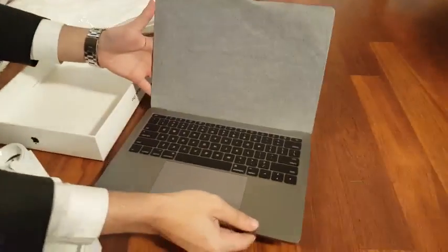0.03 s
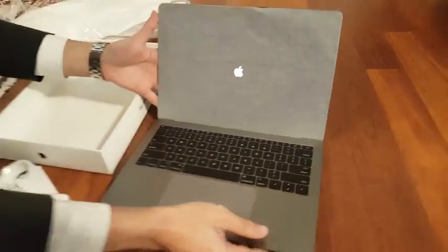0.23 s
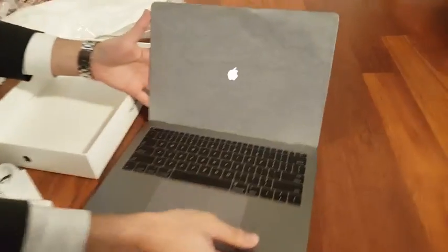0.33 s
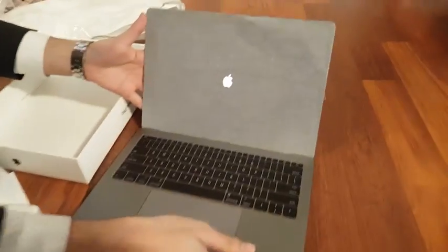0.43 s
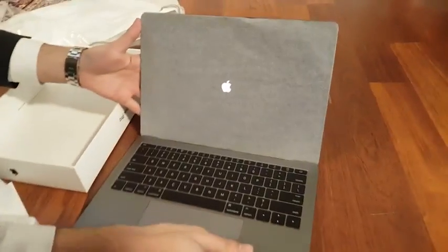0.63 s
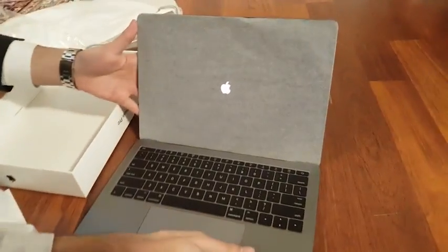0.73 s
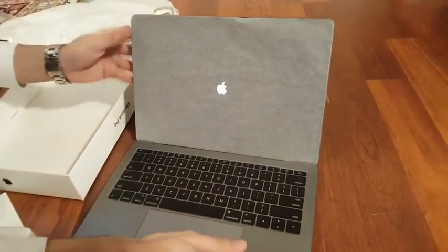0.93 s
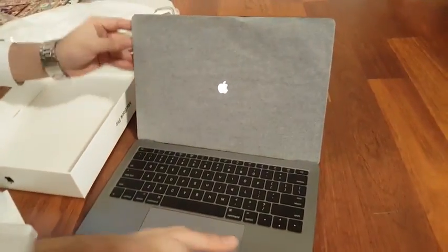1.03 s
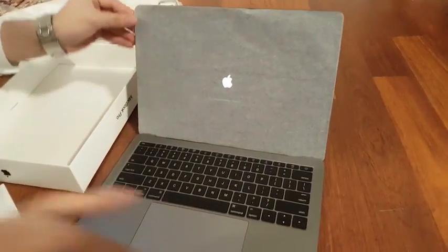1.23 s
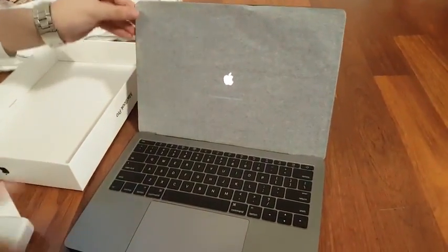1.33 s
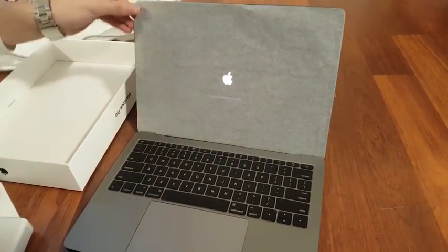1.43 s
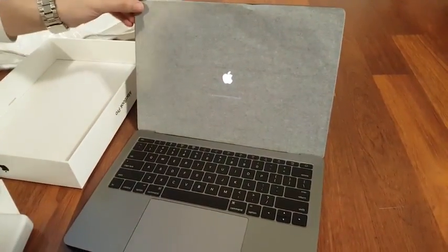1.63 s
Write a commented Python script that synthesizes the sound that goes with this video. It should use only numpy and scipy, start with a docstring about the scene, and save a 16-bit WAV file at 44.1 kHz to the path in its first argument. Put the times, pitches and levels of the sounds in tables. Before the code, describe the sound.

Two dull knocks of a laptop on wood, a settling bump, then a light lid clack.

```python
"""An open laptop is set down on a wooden floor, close in front of a stereo pair of microphones.
Its rubber feet knock twice, dully, ringing the boards and rattling the keys; it settles with a bump.
A hand lets go of the lid, which clacks twice in quick succession; fingers tick and a sleeve rustles.
Behind it the room is quiet and slightly live, with mains hum and a thin, high electronic whine."""
import sys
import numpy as np
from scipy import signal
from scipy.fft import rfft, irfft, next_fast_len
from scipy.io import wavfile
from scipy.ndimage import map_coordinates

SR = 44100
rng = np.random.default_rng(int(sys.argv[2]) if len(sys.argv) > 2 else 0)


def file_out(sig):
    """Save sig as 16-bit WAV at sys.argv[1]."""
    # one column per channel
    cols = np.atleast_2d(sig).T
    # limit, then scale
    lim = np.clip(cols, -1, 1)
    pcm = np.round(lim * 32767).astype(np.int16)
    wavfile.write(sys.argv[1], SR, pcm)


N = 74970  # 1.7 s


def amp(db):
    """Decibels to gain."""
    return 10 ** (np.asarray(db) / 20)


def along(points, hz):
    """Read a (frequency, value) curve on a log frequency axis."""
    freqs, values = np.transpose(points)
    return np.interp(np.log(hz + 1), np.log(freqs + 1), values)


def filtered(x, response):
    """Shape x by a gain given as a function of frequency."""
    size = next_fast_len(N + SR // 2)
    return irfft(rfft(x, size) * response(np.fft.rfftfreq(size, 1 / SR)), size)[..., :N]


def pan_bands(x, balance):
    """Tilt each band towards the left or right microphone."""
    return filtered(x, lambda hz: amp(along(balance, hz) * np.array([[.5], [-.5]])))


def wobble(rate):
    """A smooth random curve, rate knots a second."""
    knots = rng.standard_normal(int(N * rate / SR) + 4)
    return map_coordinates(knots, [np.arange(N) * rate / SR])


def since(start):
    """Seconds since a moment, zero before it."""
    return np.maximum(np.arange(N) / SR - start, 0)


def strike(start, attack_s, t60_s):
    """Envelope of a blow: quick rise, exponential fall."""
    age = since(start)
    return (1 - np.exp(-age / attack_s)) * np.exp(-np.log(1000) * age / t60_s)


def ring(start, modes, attack_s, alternate=True):
    """Struck, damped modes; neighbours swing in alternate directions, or all together."""
    out = np.zeros(N)
    for k, (hz, db, t60_s) in enumerate(modes):
        swing = (-1) ** (k * alternate) * np.sin(2 * np.pi * hz * since(start))
        out += amp(db) * strike(start, attack_s, t60_s) * swing
    return out


# likeness of the sound at the two microphones (frequency [Hz], correlation [0..1])
MIC_LIKENESS = [(60, 0.67), (250, 0.75), (500, 0.7), (900, 0.2), (1700, 0.00092), (3500, 0), (15000, 0.05)]

def stereo_noise(spectrum_db):
    """Noise of rms 1 with a given spectrum, alike at both microphones in the bass, wide in the treble."""
    def mid_side_gains(hz):
        angle = np.arccos(np.clip(along(MIC_LIKENESS, hz), -1, 1)) / 2
        return amp(spectrum_db(hz)) * [np.cos(angle), np.sin(angle)]
    mid, side = filtered(rng.standard_normal((2, N)), mid_side_gains)
    pair = np.array([mid + side, mid - side])
    return pair / np.sqrt(np.mean(pair ** 2) + 1e-20)


# reverberation of the room (frequency [Hz], t60 [s])
ROOM_DECAY = [(100, 0.49), (450, 0.44), (1000, 0.44), (3500, 0.39), (7000, 0.37), (14000, 0.15)]
# colour of its tail (frequency [Hz], gain [dB])
TAIL_COLOUR = [(80, -4), (200, -4.5), (450, -6.5), (800, 0.5), (1500, -1), (3500, 2), (7000, 1),
               (14000, 5.5)]
# direct sound at the microphones (frequency [Hz], left minus right [dB])
DIRECT_PAN = [(100, 0.5), (500, -0.5), (1500, 1), (3200, 1.5), (6000, -7.5), (9000, -7.5), (14000, 6)]

def in_room(x, wet_db=-5, low_cut_hz=134, rise_s=0.0029):
    """The direct sound plus the room's diffuse tail, in which each frequency dies at its own speed."""
    # small surfaces radiate little bass
    x = signal.sosfilt(signal.butter(2, low_cut_hz, "highpass", fs=SR, output="sos"), x)
    white = stereo_noise(np.zeros_like)[:, :SR * 3 // 4]
    freqs, t, bands = signal.stft(white, SR, nperseg=256)
    decay = np.exp(-np.log(1000) * t / along(ROOM_DECAY, freqs)[:, None])
    rise = 1 - np.exp(-t / rise_s)
    _, tail = signal.istft(bands * decay * rise, SR, nperseg=256)
    tail = filtered(tail / np.linalg.norm(tail[0]), lambda hz: amp(along(TAIL_COLOUR, hz)))
    reverb = signal.fftconvolve(x, tail, axes=1)[:, :N]
    return pan_bands(x, DIRECT_PAN) + amp(wet_db) * reverb


# noise floor of the room (frequency [Hz], relative density [dB])
AIR_SPECTRUM = [(15, -60), (25, -50), (44, -17), (113, -9.5), (137, -12), (222, -9.5), (291, -14.5),
                (316, -12.5), (382, -16), (527, -13), (1150, -20.5), (1320, -23.5), (1430, -22),
                (2030, -25), (10300, -35), (12400, -38), (15800, -36)]

def room_air(level_db=-57.5):
    """Still air all round the microphones: a faint, steady noise, strongest in the bass."""
    return amp(level_db) * stereo_noise(lambda hz: along(AIR_SPECTRUM, hz))


# tones of the appliances in the room (frequency [Hz], level [dB])
HUM_TONES = [(59.7, -62.5), (107.7, -60.5), (215, -70), (323, -68.5), (525, -69), (1361, -70.5)]

def mains_hum(waver_db=0.5, drift_rad=0.33):
    """Appliances hum alike in both microphones, each tone wavering in level and phase."""
    hum = np.zeros(N)
    for hz, db in HUM_TONES:
        peak = np.sqrt(2) * amp(db + waver_db * wobble(3.9))
        phase = 2 * np.pi * (hz * since(0) + rng.random()) + drift_rad * wobble(5.92)
        hum += peak * np.sin(phase)
    return hum


# wandering pitch of the whine (time [s], frequency [Hz])
WHINE_PITCH = [(0, 12500), (.4, 12900), (.75, 12740), (1.249, 12800), (1.7, 12940)]

def electronic_whine(level_db=-80.5, jitter_hz=89, left_lead_db=17.5):
    """Electronics give off one thin, jittering tone, well to the left."""
    hz = np.interp(since(0), *np.transpose(WHINE_PITCH)) + jitter_hz * wobble(400)
    tone = np.sqrt(2) * np.sin(2 * np.pi * np.cumsum(hz) / SR)
    return amp(level_db) * tone * amp([[left_lead_db / 2], [-left_lead_db / 2]])


# swell of the sleeve's rustle (time [s], level [dB])
SLEEVE_LEVEL = [(0, -52.5), (.13, -53.5), (.25, -53), (.4, -65), (.65, -68), (0.901, -69), (1.1, -66),
                (1.35, -60), (1.7, -81)]
# rubbing cloth (frequency [Hz], relative density [dB])
CLOTH_SPECTRUM = [(100, -15), (400, 1), (750, -0.5), (1400, -12.5), (3200, -9.5), (6500, -17),
                  (10000, -27.5), (16000, -49)]

def sleeve_rustle(flicker_db=1.1):
    """A sleeve rustles faintly and unevenly, heard dry at the microphones."""
    level_db = np.interp(since(0), *np.transpose(SLEEVE_LEVEL)) + flicker_db * wobble(39.23)
    return amp(level_db) * stereo_noise(lambda hz: along(CLOTH_SPECTRUM, hz))


# fingertips on the casing (time [s], level [dB], band centre [Hz])
FINGER_TICKS = [(0.1115, -36.5, 600), (0.669, -44.5, 2340), (0.71, -47, 1510), (1.348, -41.5, 2050),
                (1.587, -51, 2780)]

def finger_ticks(half_width_octaves=0.3):
    """Each fingertip touches the casing with a very short burst of band-limited noise."""
    ticks = np.zeros((2, N))
    for start, db, centre_hz in FINGER_TICKS:
        def band_db(hz):
            octaves_off = np.log2((hz + 1) / centre_hz)
            return -10 * np.log10(1 + (octaves_off / half_width_octaves) ** 4)
        ticks += amp(db) * strike(start, attack_s=0.00052, t60_s=0.016) * stereo_noise(band_db)
    return in_room(ticks)


# the lid's clack, then its rebound (ring level [dB], buzz level [dB], snap level [dB])
LID_CLACKS = [(-25.5, -41, -29), (-24, -35, -26)]
# modes of the lid (frequency [Hz], relative level [dB], t60 [s])
LID_MODES = [(200, -4, 0.031), (360, -11.5, 0.075), (410, -7.5, 0.077), (570, -3, 0.043), (866, -19.5, .14),
             (1169, -5.5, 0.017), (1582, -20.5, 0.03), (1826, -14, 0.017)]
# contact noise of the lid (frequency [Hz], relative density [dB])
CONTACT_SPECTRUM = [(200, 4.5), (1200, 3.5), (2500, -4.5), (4200, -9), (7000, -10), (9000, -22),
                    (12500, -24), (16000, -29)]

def lid_clacks(first_s=.9905, rebound_s=.0066, attack_s=0.00013):
    """A hard, light contact and its rebound: each snaps, buzzes briefly and rings the lid."""
    clacks = np.zeros((2, N))
    for k, (ring_db, buzz_db, snap_db) in enumerate(LID_CLACKS):
        start = first_s + k * rebound_s
        buzz = amp(buzz_db) * strike(start, attack_s=0.00035, t60_s=0.073)
        snap = amp(snap_db) * strike(start, attack_s, t60_s=0.004)
        contact = (buzz + snap) * stereo_noise(lambda hz: along(CONTACT_SPECTRUM, hz))
        clacks += amp(ring_db) * ring(start, LID_MODES, attack_s) + contact
    return in_room(clacks, wet_db=-10)


# loose keys and casing (frequency [Hz], relative density [dB])
RATTLE_SPECTRUM = [(100, -7.5), (700, 8.5), (1300, 0.5), (2200, 2), (4000, -5.5), (6300, -12.5),
                   (8500, -19), (10500, -29.5), (12500, -19.5), (16000, -45)]

def key_rattle(start):
    """Keys and casing buzz briefly after a jolt."""
    buzz = stereo_noise(lambda hz: along(RATTLE_SPECTRUM, hz))
    return strike(start, attack_s=0.0019, t60_s=0.044) * buzz


# the laptop settling on the floor (time [s], thud level [dB], rattle level [dB])
SETTLING_BUMPS = [(.147, -42, -78), (0.5065, -26, -35.5), (0.74, -60, -72), (1.126, -39, -75.5)]

def settling_bumps(mode_hz=147, t60_s=.05):
    """Soft shifts of weight stir only the lowest mode and lightly shake the keys."""
    bumps = np.zeros((2, N))
    for start, thud_db, rattle_db in SETTLING_BUMPS:
        thud = ring(start, [(mode_hz, 0, t60_s)], attack_s=.0004)
        bumps += amp(thud_db) * thud + amp(rattle_db) * key_rattle(start)
    return in_room(bumps)


# feet landing close to the microphones (time [s], thud level [dB], rattle level [dB])
FOOT_KNOCKS = [(0.2277, -7.5, -32), (.4264, -0.5, -19)]
# the laptop against the boards (frequency [Hz], relative level [dB], t60 [s])
BODY_MODES = [(156.6, -14.5, 0.033), (370, -6, 0.021), (504.3, -5.5, 0.028), (858, -18.5, 0.021),
              (1120, -19.5, 0.011), (1338, -30.5, 0.055), (1785, -25, 0.011), (2630, -34, 0.011),
              (4183, -38, 0.034)]
# lingering ring of the floorboards (frequency [Hz], relative level [dB], t60 [s])
BOARD_MODES = [(142, -47, 0.48), (181.5, -39, 0.39), (300, -41.5, 0.45), (364, -42, .3), (417, -40.5, .3),
               (464.7, -34, 0.56), (484, -37, 0.38), (554, -53, 0.19), (754, -46.5, 0.57), (850, -42, 0.15),
               (1043, -49.5, 0.41)]

def foot_knocks():
    """Each rubber foot thuds on the boards, leaves them ringing and jolts the casing."""
    knocks = np.zeros((2, N))
    for start, thud_db, rattle_db in FOOT_KNOCKS:
        body = ring(start, BODY_MODES, attack_s=.0004)
        boards = ring(start, BOARD_MODES, attack_s=0.0058, alternate=False)
        knocks += in_room(amp(thud_db) * (body + boards) + amp(rattle_db) * key_rattle(start))
    return knocks


def scene():
    """The laptop and the hands on it close in front, over the tone of a quiet room."""
    laptop = foot_knocks() + settling_bumps() + lid_clacks()
    hands = finger_ticks() + sleeve_rustle()
    room_tone = mains_hum() + electronic_whine() + room_air()
    return room_tone + hands + laptop


# colour of one microphone against the other (frequency [Hz], left minus right [dB])
MIC_BALANCE = [(60, 0.5), (200, 0), (500, 2.5), (1000, 1), (1800, 1.5), (3300, -1.5), (6000, -4.5),
               (9000, 4.5), (14000, 1.5)]

def record(dry):
    """The two microphones differ in colour; the recorder keeps nothing above its band limit."""
    band_limit_hz = 15900
    return filtered(pan_bands(dry, MIC_BALANCE), lambda hz: hz < band_limit_hz)


dry = scene()
out = record(dry)
file_out(out)
```